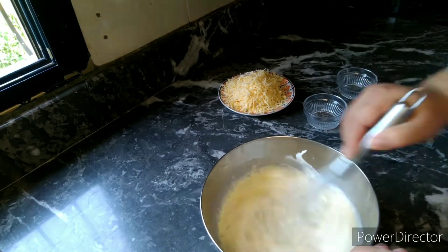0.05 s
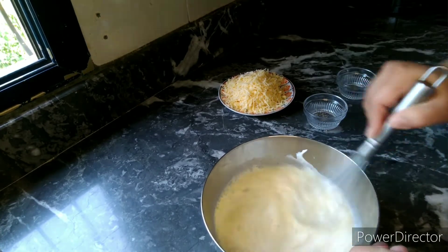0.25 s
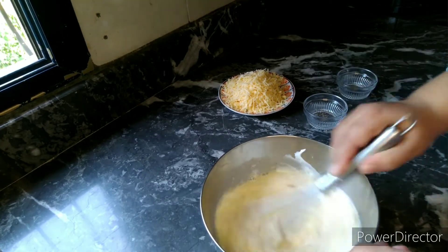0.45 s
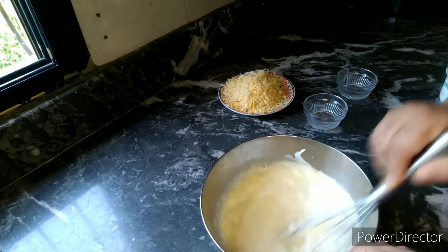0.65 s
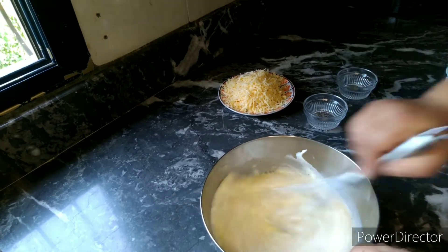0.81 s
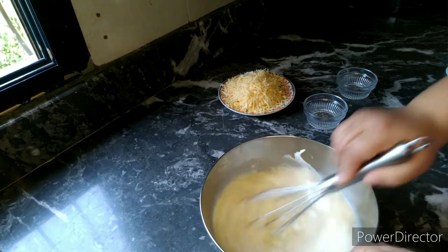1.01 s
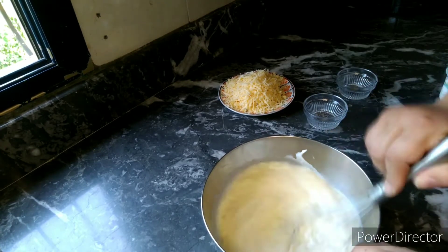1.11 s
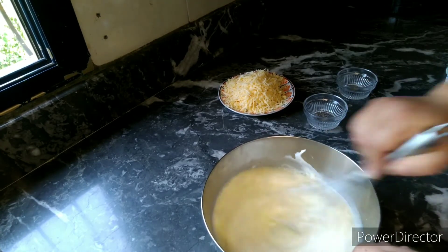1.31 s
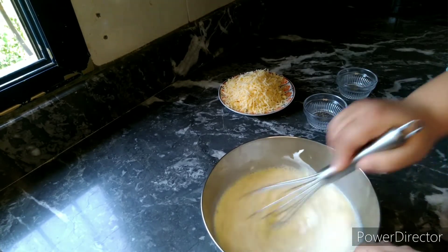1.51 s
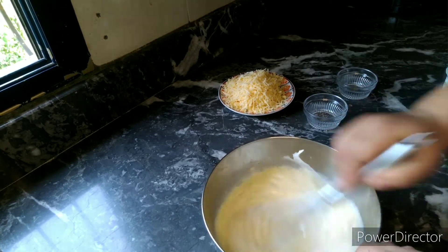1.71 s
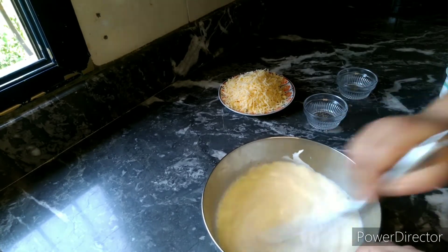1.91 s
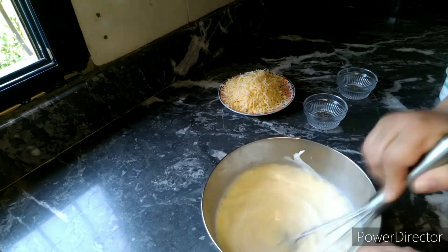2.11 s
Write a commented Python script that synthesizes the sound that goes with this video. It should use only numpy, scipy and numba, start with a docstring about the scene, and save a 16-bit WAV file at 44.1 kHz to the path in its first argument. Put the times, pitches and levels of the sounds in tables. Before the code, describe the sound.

A wire whisk beats wet batter in a steel bowl with uneven metallic ticks and scrapes

```python
"""A wire whisk works batter in a steel bowl on a stone kitchen counter, close to a two-port microphone.
At first a fading hum and quiet room air lie behind a low thud and a soft scrape; at 0.2 s hard ticks of
wire on steel ring at 5-9 kHz (decaying modes) over a wet squelch (bubble clicks, sagging pocket notes).
Lighter scrapes and cuts follow; near 1.6 s a strong stroke lands and the bowl judders on the stone
(clicks through base modes), again at 1.73 s; a last stroke comes at 2.07 s, all in a small hard room."""
import sys
import numpy as np
from scipy import signal
from scipy.fft import rfft, irfft
from scipy.io import wavfile
from scipy.ndimage import uniform_filter1d
from numba import njit

SR = 44100
rng = np.random.default_rng(int(sys.argv[2]) if len(sys.argv) > 2 else 0)


def master_out(mix):
    """Clip the mix to full scale and print it as 16-bit PCM to the path in sys.argv[1]."""
    frames = np.transpose(np.atleast_2d(mix))
    ceiling = np.clip(frames, -1, 1)
    pcm = np.round(ceiling * 32767).astype(np.int16)
    wavfile.write(sys.argv[1], SR, pcm)


N = 94815  # samples


def undb(db):
    """Decibels to gain."""
    return 10 ** (np.asarray(db) / 20)


def unit(x):
    """Scale to rms 1."""
    return x / np.sqrt(np.mean(x ** 2))


def fade(t, t60):
    """Exponential decay from time 0, reaching -60 dB after t60 seconds (2 ms at least)."""
    return undb(-60 * np.maximum(t, 0) / max(t60, .002))


def stroke(t, start, rise, hold, t60):
    """Envelope of one movement: squared rise, hold and exponential fade."""
    attack = np.clip((t - start) / max(rise, .001), 0, 1) ** 2
    return attack * fade(t - start - rise - hold, t60)


def curve(points):
    """Gain at every frequency, interpolated over log frequency from (f/Hz, level/dB) points."""
    hz, db = np.array(points, float).T
    bins_hz = np.arange(N + 1) * SR / (2 * N)
    return undb(np.interp(np.log(bins_hz + 1), np.log(hz), db))


def colour(x, points):
    """Causal filter of unit power with the given spectrum, its phase folded from the cepstrum."""
    cepstrum = irfft(np.log(unit(curve(points))))
    cepstrum[1:N] *= 2
    cepstrum[N + 1:] = 0
    response = np.exp(rfft(cepstrum))
    return irfft(rfft(x, 2 * N) * response)[..., :N]


def convolve(x, response):
    """Pass each channel through its response."""
    return signal.fftconvolve(np.atleast_2d(x), response, axes=-1)[:, :N]


@njit
def resonance(x, hz, width):
    """State-variable band-pass with a moving centre."""
    y, band, low = np.empty(len(x)), 0., 0.
    for i in range(len(x)):
        g, k = np.tan(np.pi * hz[i] / SR), width / hz[i]
        v = (band + g * (x[i] + 1e-18 - low)) / (1 + g * (g + k))
        band, low, y[i] = 2 * v - band, low + 2 * g * v, k * v
    return y


def ringing(x, hz, width):
    """Every channel through two equal resonances in a row, at rms 1."""
    centre, width = hz * np.ones(N), float(width)
    return unit(np.array([resonance(resonance(c, centre, width), centre, width) for c in x]))


def clicks(rate, spread_db, shared):
    """Dense random clicks of uneven size: some reach both ports alike, the rest by way of the bowl's wall."""
    hits = rng.random((3, N)) < rate / SR
    signs = rng.choice([-1, 1], (3, N))
    x = hits * signs * undb(spread_db * rng.standard_normal((3, N)))
    power = np.abs(uniform_filter1d(x ** 2, size=900))
    x = x / np.sqrt(power + 1e-9)  # even out the level over about 20 ms
    return np.sqrt(shared) * x[0] + np.sqrt(1 - shared) * x[1:]


def shifting(x, depth_db):
    """The moving whisk shifts the bowl's reflections: narrow peaks and dips come and go."""
    z = signal.stft(x, nperseg=512)[2]
    field = uniform_filter1d(rng.standard_normal(z.shape[1:]), size=3, axis=0)  # over frequency
    field = unit(uniform_filter1d(field, size=7, axis=1))  # over time
    return unit(signal.istft(z * undb(depth_db * field))[1][:, :N])


def echoes(t, t60, db):
    """Diffuse decaying reflections, different at each port."""
    return unit(rng.standard_normal((2, N)) * fade(t, t60)) * undb(db) / np.sqrt(N)


# Spectrum of the room air behind the counter: f/Hz, level/dB
AIR_SPECTRUM = [(25, -20), (80, -10), (300, -4.5), (1300, -12.5), (7000, -10.5), (15000, -28)]
# The faint appliance hum, fading: t/s, level/dB
HUM_FADE = [(0, -62.5), (.62, -64), (.85, -70), (2.15, -76.5)]
AIR_DB = -58
HUM_HZ, HUM_WIDTH_HZ, OCTAVE_DB = 83.4, 38, -1


def kitchen(t):
    """Behind everything: coloured noise for room air, and noise in two low resonances for the hum."""
    air = colour(rng.standard_normal(N) + 1.15 * rng.standard_normal((2, N)), AIR_SPECTRUM)
    shake = rng.standard_normal((1, N))
    hum = ringing(shake, HUM_HZ, HUM_WIDTH_HZ)
    hum = hum + undb(OCTAVE_DB) * ringing(shake, 2 * HUM_HZ, 2 * HUM_WIDTH_HZ)
    hum_level = undb(np.interp(t, *np.array(HUM_FADE).T))
    return undb(AIR_DB) * unit(air) + hum_level * hum


# The bowl nudges the counter: t/s, f/Hz, level/dB
NUDGES = [(0, 83, -34), (.045, 69.5, -48), (.625, 160, -49.5), (1.492, 210, -48), (1.604, 158, -38.5)]
NUDGE_RISE_S, NUDGE_T60_S = 0.0028, 0.084


def bump(t):
    """Under the bowl: each nudge of the counter is a low sine thud that dies exponentially."""
    out = 0
    for start, hz, db in NUDGES:
        thud = np.sin(2 * np.pi * hz * (t - start))
        out = out + undb(db) * thud * stroke(t, start, NUDGE_RISE_S, 0, NUDGE_T60_S)
    return out


# Clicks of the bowl's base and of the batter; the share is what both ports hear alike
POPS_PER_S, POP_SPREAD_DB, POP_SHARED = 1200, 3, 0.61
# The base judders over the stone: start t/s, rise t/s, hold t/s, fade to -60 dB t/s, level/dB
JUDDERS = [(1.598, 0.0037, 0.094, 0.2354, -36), (1.725, 0.0038, 0.065, 0.0156, -39)]
# Modes of the base: f/Hz, level/dB
BASE_MODES = [(285, -1), (440, 2.5), (580, -1), (750, 1.5)]
BASE_WIDTH_HZ, BASE_RISE_PER_S = 68, 0.52  # the modes climb as the bowl tilts


def slide(t):
    """On the counter: the dragged bowl sticks and slips on the stone, ringing the modes of its base."""
    slips, out = clicks(POPS_PER_S, POP_SPREAD_DB, POP_SHARED), 0
    for start, rise, hold, t60, db in JUDDERS:
        tilt = np.exp(BASE_RISE_PER_S * np.clip(t - start - hold / 2, -hold, hold))
        modes = [undb(mode_db) * ringing(slips, hz * tilt, BASE_WIDTH_HZ) for hz, mode_db in BASE_MODES]
        out = out + undb(db) * stroke(t, start, rise, hold, t60) * unit(sum(modes))
    return out


# Wires cut the batter: start t/s, rise t/s, hold t/s, fade to -60 dB t/s, level/dB before BATTER_DB,
# air pocket f/Hz at the start, then pocket level/dB and spatter level/dB against the bubbles
CUTS = [(0, 0.00046, 0.036, 0.32, -50, 1320, -2.5, -1), (0.2, 0.0086, 0.014, 0.03, -41, 1640, -3, 9.5),
        (0.23, 0.0077, 0.055, -0.21, -53, 760, -5.5, 6), (0.455, 0.058, 0.12, 0.57, -57, 620, -10, -0.5),
        (0.61, 0.0078, 0.012, 0.38, -48, 1190, -14, -2), (0.892, 0.012, 0.017, 0.83, -60, 840, 1.5, 3.5),
        (1.087, 0.012, 0.011, 0.95, -65, 845, 10, -19), (1.275, 0.0073, 0.014, 0.16, -62, 980, 5.5, 11.5),
        (1.332, 0.014, 0.013, 0.54, -57.5, 860, 0.5, -4), (1.472, 0.073, 0.084, 0.27, -49, 405, -3.5, -18),
        (1.596, 0.0036, 0.025, 0.14, -29, 818, -6, -5.5), (1.643, 0.0087, 0.045, 0.23, -38.5, 1520, -7, -8),
        (1.723, 0.0033, 0.041, 0.19, -49.5, 938, 11.5, 12), (1.848, 0.0039, 0.0092, 0.5, -55.5, 887, 7, 1),
        (2.072, 0.013, 0.029, 0.2, -55.5, 873, 10.5, 0)]
# Spectrum of the tiny bubbles: f/Hz, level/dB
BUBBLE_SPECTRUM = [(30, -13), (120, -13), (220, 0), (420, 1), (800, -1.5), (1400, -7), (2500, -21),
                   (6000, -26.5)]
# Spectrum of the spatter: f/Hz, level/dB
SPATTER_SPECTRUM = [(400, -18.5), (1400, -4.5), (3500, -5.5), (10000, -21.5)]
POCKET_WIDTH_HZ, POCKET_SAG_PER_S = 217, 1.44
OVERTONE_RATIO, OVERTONE_DB = 2.21, -10
BATTER_PATCHY_DB, BATTER_DB = 3.5, -1.5
ROOM_T60_S, BATTER_ROOM_DB, WHISK_ROOM_DB = 0.083, -6, -4  # small hard room


def batter(t):
    """In the bowl: each cut pops tiny bubbles, opens an air pocket whose two notes sag, and throws spatter."""
    bubbles, spatter, pops = (clicks(POPS_PER_S, POP_SPREAD_DB, POP_SHARED) for _ in range(3))
    bubbles = shifting(colour(bubbles, BUBBLE_SPECTRUM), BATTER_PATCHY_DB)
    spatter = shifting(colour(spatter, SPATTER_SPECTRUM), BATTER_PATCHY_DB)
    out = 0
    for start, rise, hold, t60, db, hz, pocket_db, spatter_db in CUTS:
        note = hz * np.exp(-POCKET_SAG_PER_S * np.clip(t - start - rise, -rise, hold + t60))
        overtone = ringing(pops, note * OVERTONE_RATIO, 2 * POCKET_WIDTH_HZ)
        pocket = ringing(pops, note, POCKET_WIDTH_HZ) + undb(OVERTONE_DB) * overtone
        squelch = bubbles + undb(pocket_db) * pocket + undb(spatter_db) * spatter
        out = out + undb(db) * stroke(t, start, rise, hold, t60) * squelch
    return (out + convolve(out, echoes(t, ROOM_T60_S, BATTER_ROOM_DB))) * undb(BATTER_DB)


# Wires strike the bowl: t/s, level/dB over TICK_S before WHISK_DB
STRIKES = [(0.1707, -30.5), (0.2071, -8), (0.2095, -6.5), (0.646, -29.5), (0.8714, -28), (1.021, -24),
           (1.340, -24), (1.3521, -17.5), (1.403, -33), (1.5984, -19), (1.6038, -10), (1.7306, -16.5),
           (1.7522, -12), (1.854, -23), (1.874, -21.5), (2.0864, -24)]
# Spectrum of a strike: f/Hz, level/dB
STRIKE_SPECTRUM = [(200, -29), (1200, -22.5), (3800, -12.5), (5400, -1), (8300, 7.5), (12000, -6.5),
                   (15500, -25)]
TICK_S, BOWL_T60_S = 0.002, 0.014  # time over which the level is taken; decay inside the bowl


def ticks(t):
    """Close by: each strike of wire on steel is a noise burst that bounces round inside the bowl."""
    blows, n = np.zeros((2, N)), 1024
    for (start, db), chatter in zip(STRIKES, rng.standard_normal((len(STRIKES), 3, n))):
        i = int(start * SR)
        burst = (chatter[0] + chatter[1:]) * fade(t[:n], BOWL_T60_S)  # one common part, one per port
        blows[:, i:i + n] += undb(db) * unit(burst) * np.sqrt(TICK_S * SR / n)
    return colour(blows, STRIKE_SPECTRUM)


# Wires drag over the steel: start t/s, rise t/s, hold t/s, fade to -60 dB t/s, level/dB before WHISK_DB,
# note of the rubbed wire f/Hz, then note level/dB and fine hiss level/dB against the rasp
DRAGS = [(0, 0.00053, 0.005, 0.45, -41.5, 6850, -2.5, 4), (0.139, 0.03, 0.078, 0.1, -42, 8450, 5, 7.5),
         (0.192, 0.008, 0.027, 0.55, -24.5, 6840, -9, -9.5),
         (0.475, 0.0067, 0.0094, 1, -39.5, 7000, -10, -17), (0.571, 0.019, 0.053, 0.4, -39, 8400, -8, -1),
         (0.611, 0.026, 0.0084, 0.13, -31.5, 8360, 4.5, -19),
         (0.718, 0.024, 0.042, 2.7, -44, 6830, -2.5, -9), (0.881, 0.009, 0.019, 0.58, -41, 8320, 6, -15),
         (1.022, 0.0044, 0.021, 0.38, -32, 8540, -5.5, -8),
         (1.075, 0.0078, 0.011, 0.68, -38, 7200, -1.5, -7),
         (1.267, 0.006, 0.01, 1.33, -41.5, 6700, -3.5, -9),
         (1.347, 0.014, 0.046, 0.33, -32.5, 7540, -2, -12.5),
         (1.592, 0.0046, 0.027, 0.67, -25.5, 7950, -6, -3.5),
         (1.728, 0.0016, 0.0052, 0.31, -26, 5200, -12, -26),
         (1.742, 0.005, 0.0086, 0.39, -26, 8600, -6, -3), (1.851, 0.0036, 0.02, 0.47, -34.5, 9300, 1, -0.5),
         (2.071, 0.008, 0.0099, 0.4, -37, 5930, 0, -0.5)]
# Spectrum of the rasp of the wires: f/Hz, level/dB
RASP_SPECTRUM = [(200, -76.5), (2500, -18.5), (4400, -15.5), (5300, -5), (6700, -3.5), (8600, 0.5),
                 (9800, -6), (12000, -20), (15500, -27.5)]
# Spectrum of the fine hiss: f/Hz, level/dB
HISS_SPECTRUM = [(5000, -23.5), (10300, 12.5), (13000, 4.5), (15500, 0)]
CATCHES_PER_S, CATCH_SPREAD_DB, WIRE_SHARED = 1800, -1.5, 0.22  # share heard alike at both ports
SING_WIDTH_HZ, WIRE_PATCHY_DB = 1650, 5.5


def scrapes():
    """Close by: stick-slip catches of wire on steel give a rasp, a fine hiss and a broad singing note."""
    t = np.arange(N) / SR
    catches, slips, fine = (clicks(CATCHES_PER_S, CATCH_SPREAD_DB, WIRE_SHARED) for _ in range(3))
    singing, rasp_power, hiss_power = 0, 0, 0
    for start, rise, hold, t60, db, hz, sing_db, hiss_db in DRAGS:
        force = undb(db) * stroke(t, start, rise, hold, t60)
        rasp_power = rasp_power + force ** 2
        hiss_power = hiss_power + (force * undb(hiss_db)) ** 2
        singing = singing + force * undb(sing_db) * ringing(slips, hz, SING_WIDTH_HZ)
    rasp = np.sqrt(rasp_power) * shifting(colour(catches, RASP_SPECTRUM), WIRE_PATCHY_DB)
    hiss = np.sqrt(hiss_power) * shifting(colour(fine, HISS_SPECTRUM), WIRE_PATCHY_DB)
    return singing + rasp + hiss


RING_LOW_HZ, RING_HIGH_HZ = 5208, 9243  # the many wire loops ring between these notes
RING_T60_S, RING_DB, WHISK_DB = 0.19, -11.5, -5.5


def loops(t, count):
    """Close-set decaying modes of the wire loops, each heard with its own phase at each port."""
    t = t[:SR // 2]
    ring = 0
    for k, (offset, *phases) in enumerate(rng.random((count, 3))):
        hz = RING_LOW_HZ + (RING_HIGH_HZ - RING_LOW_HZ) * (k + offset) / count
        # phases between 0 and 1 cycle
        ring = ring + np.sin(2 * np.pi * (hz * t + np.array(phases)[:, None]))
    return unit(np.pad(ring * fade(t, RING_T60_S), ((0, 0), (0, N - len(t)))))


def whisk(t):
    """Nearest the microphone: ticks and scrapes of wire on steel, both setting the loops ringing."""
    contact = ticks(t) + scrapes()
    ring = loops(t, count=70) * undb(RING_DB) / np.sqrt(N)
    room = echoes(t, ROOM_T60_S, WHISK_ROOM_DB)
    return (contact + convolve(contact, ring + room)) * undb(WHISK_DB)


def scene():
    """Room, bowl, batter and whisk together."""
    t = np.arange(N) / SR
    return kitchen(t) + bump(t) + slide(t) + batter(t) + whisk(t)


# Left against right microphone port: f/Hz, L-R level/dB
PORT_BALANCE = [(80, 3.5), (5500, 5), (8000, 5), (11500, -2)]
PORT_LAG_S, CEILING, TOP_HZ = .00004, 0.72, 15600


def record(dry):
    """The left port hears all later and in another colour; peaks are rounded and the top is cut."""
    lean = np.sqrt(curve(PORT_BALANCE))  # half the difference to each port
    late = np.exp(-1j * np.pi * np.arange(N + 1) * SR / N * PORT_LAG_S)
    heard = irfft(rfft(dry, 2 * N) * np.array([lean * late, 1 / lean]))[:, :N]
    rounded = CEILING * np.tanh(heard / CEILING)
    return signal.sosfilt(signal.ellip(10, .2, 80, TOP_HZ, fs=SR, output="sos"), rounded)


dry = scene()
out = record(dry)
master_out(out)
```